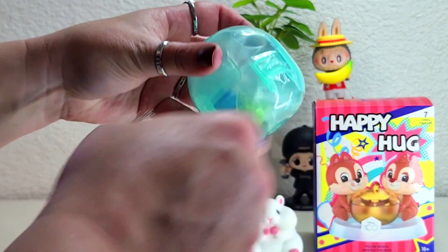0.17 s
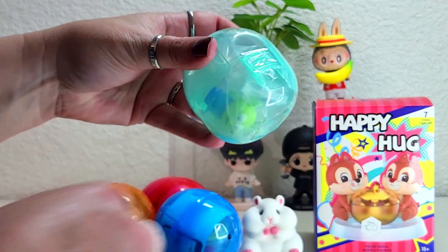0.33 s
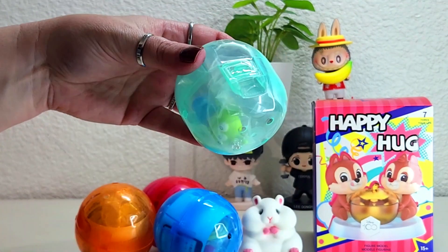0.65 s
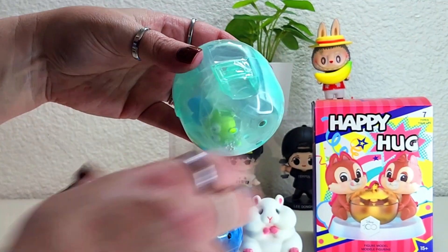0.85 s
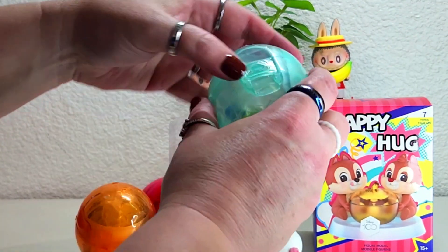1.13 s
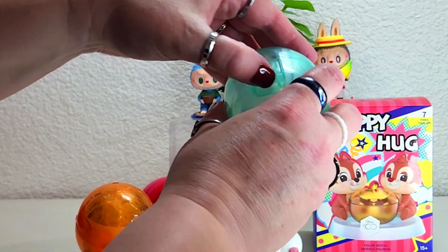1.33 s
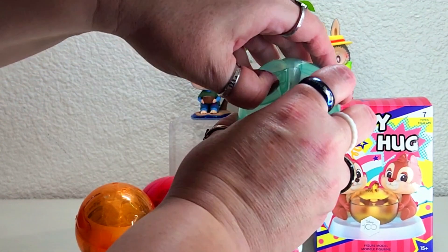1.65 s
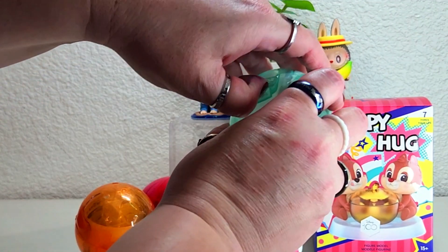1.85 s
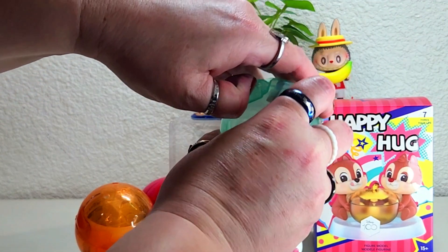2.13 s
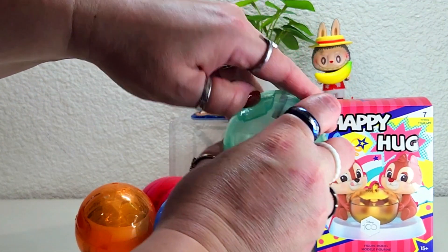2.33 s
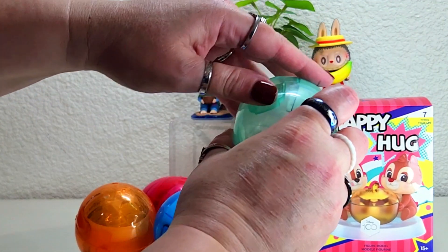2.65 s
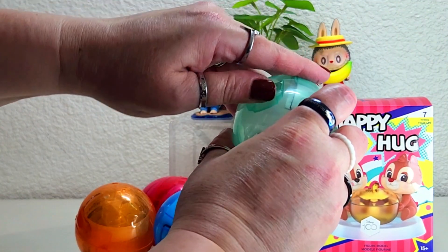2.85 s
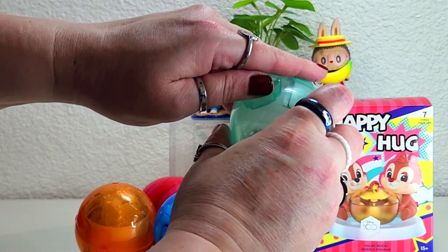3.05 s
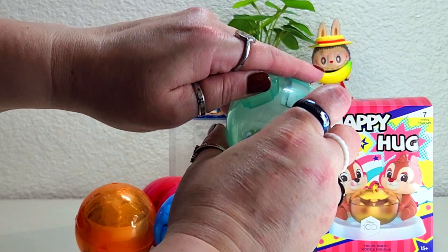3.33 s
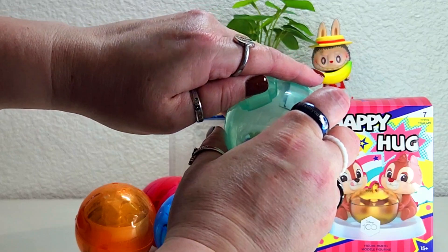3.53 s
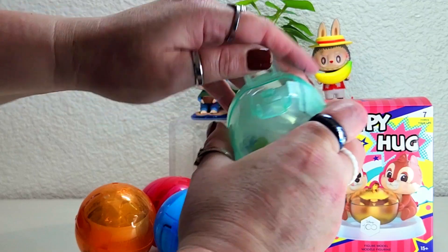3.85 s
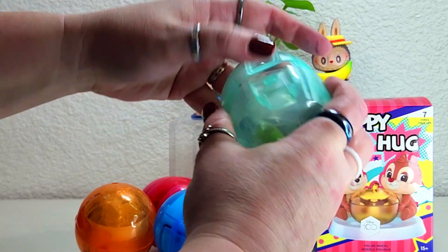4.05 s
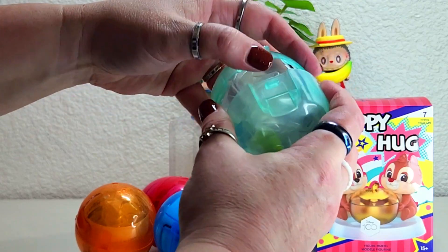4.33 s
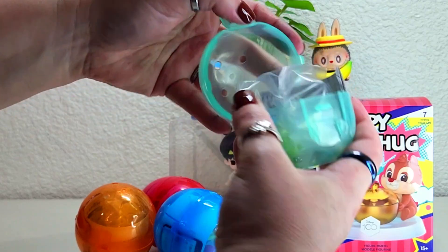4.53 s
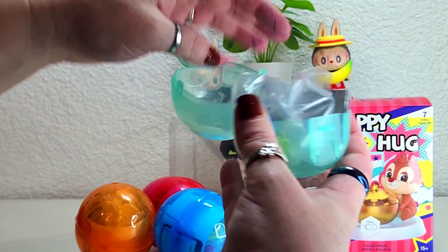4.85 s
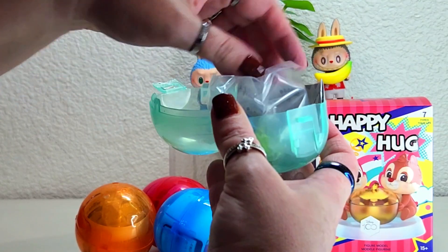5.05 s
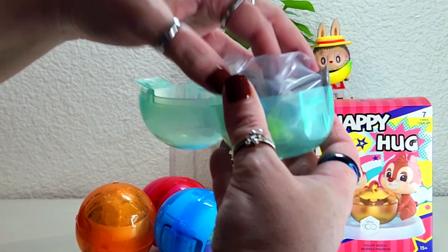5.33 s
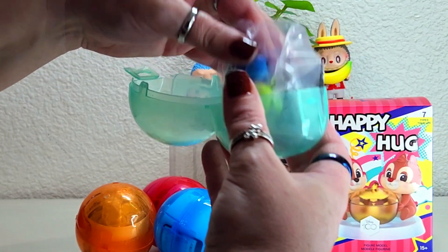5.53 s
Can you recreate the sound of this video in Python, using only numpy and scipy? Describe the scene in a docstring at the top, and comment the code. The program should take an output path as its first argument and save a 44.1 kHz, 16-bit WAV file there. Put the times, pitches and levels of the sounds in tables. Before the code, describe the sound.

Close to the microphone in a small quiet room, a dull tap leads to a quick cluster of hard plastic knocks. Nails tick at a capsule seam, four sharp snaps follow, then a louder hollow pop with a brief chatter. Soft bumps come next, and a thin plastic bag crackles faintly at the end over low hum.

```python
"""A plastic toy capsule is opened by hand, close to the microphone in a small quiet room with a low hum.
A dull tap, then capsules knock; nails pick at the seam, skin rubs the shell and catches snap free one by one,
with soft hollow bumps before and after the halves chatter; last, fingers pinch the crinkly bag inside.
A contact is a noise crack and ring, filtered by the resonances of the body struck; rubbing and creasing
are dense random grains. Echoes with a diffuse tail and filtered-noise room tone lie behind."""
import sys
import numpy as np
from scipy import signal
from scipy.fft import rfft, irfft
from scipy.io import wavfile
from scipy.ndimage import uniform_filter1d

SR = 44100
rng = np.random.default_rng(int(sys.argv[2]) if len(sys.argv) > 2 else 0)


def generate_wav(sig):
    """Save sig (samples, or channels by samples) to the path in sys.argv[1] as 16-bit PCM at SR."""
    pcm = np.round(np.clip(np.atleast_2d(sig).T, -1, 1) * 32767).astype(np.int16)
    wavfile.write(sys.argv[1], SR, pcm)


N = 250488
SIZE = 8192  # samples in one contact or stroke

# Centres of a contact's colour bands: low, hollow, middle, edge, crack [f/Hz]
COLOUR_HZ = [420, 1060, 2530, 6000, 12000]
# Catches letting go [t/s, level/dB, main ring f/Hz, hollow/dB, edge/dB, crack/dB, low/dB,
# left-right/dB, room trim/dB]; colours are densities per Hz re middle band
SNAPS = [(1.8006, -19, 819, 0, 3, 2, -23, 0, -5.5), (2.0764, -19, 2290, -2.5, -4.5, -12, -26, 0.5, -6),
         (2.3692, -23.5, 8100, -1, 14.5, 23, -2, 2.5, -10), (3.0708, -25, 3026, -18.5, 0.5, 2, -29, 4, -13),
         (3.6044, -18, 3460, 8, 0, -18, -20, 3, 0.5)]
# Folds of the bag buckling [t/s, level/dB, main ring f/Hz]
FOLDS = [(5.2753, -55, 1290), (5.2855, -47, 1360), (5.3121, -45, 2030), (5.3223, -44, 1900),
         (5.3604, -46, 1380), (5.38, -44, 2110), (5.397, -43.5, 2070), (5.4128, -35, 2000),
         (5.4347, -55, 5250), (5.4928, -52.5, 2160), (5.5148, -38.5, 1870)]
# Resonances of the held shell [f/Hz, width/Hz, level over the broad response/dB]
SHELL_MODES = [(850, 200, 7.7), (1040, 47, 7), (1240, 75, 13), (1390, 70, 11), (1620, 30, 6), (2240, 50, 5),
               (2980, 130, 3.6), (3350, 160, 5), (4160, 60, 3.7), (4790, 120, 2.1), (5400, 90, 2.7),
               (6170, 50, 1.7), (7620, 140, 13), (8100, 320, 10)]
# Resonances of the bag [f/Hz, width/Hz, level over the broad response/dB]
BAG_MODES = [(1295, 200, 10.7), (1940, 160, 5.6), (3070, 120, 3.6), (5250, 210, 1.7), (7560, 680, 8.6)]
# Ring of soft shell contacts [crack decay/s, ring decay/s, ring level/dB]
BUMP_RING = (.002, .005, 2)


def catch_snaps():
    """Catches let go: a very short crack excites the held shell."""
    # [crack decay/s, ring decay/s, ring level/dB]
    ring = (.0006, .006, -7)
    return contacts(SNAPS, SHELL_MODES, *ring, main_db=13.0, room_db=-3.0, lag_s=2.7e-5)


def chatter(count, pitch_spread_oct):
    """After the last catch the halves meet in an uneven, fading run of contacts."""
    gap_s, first_db, fall_db_per_s, centre_hz = .0065, -33, 63, 1450
    # Colour re middle band [hollow/dB, edge/dB, crack/dB]
    colour = (0, -1, -20.5)
    late, pitch = rng.uniform(-.5, .5, (count, 2)).T
    after_s = gap_s * (1 + np.arange(count) + late)
    last_snap_s = SNAPS[-1][0]
    rows = []
    for t, p in zip(after_s, pitch):
        level_db = first_db - fall_db_per_s * t
        main_hz = centre_hz * 2 ** (pitch_spread_oct * p)
        rows.append((last_snap_s + t, level_db, main_hz, *colour))
    return contacts(rows, SHELL_MODES, *BUMP_RING, main_db=11.5, room_db=-7, lag_s=3.3e-5)


def capsule_knocks():
    """Closed capsules knock together and ring in their own modes."""
    # [t/s, level/dB, main ring f/Hz, hollow/dB, edge/dB, crack/dB, low/dB, left-right/dB, room trim/dB]
    hits = [(0.5904, -19, 2370, -1, -9.5, -26, -9, 5.5, -11),
            (0.6095, -28.5, 2620, 1.5, -15.5, -39.5, -11, -7.5, 0.5),
            (0.654, -43, 2454, 2.5, -9, -33, -10.5, 0, -7.5),
            (0.6898, -18.5, 2370, 2.5, -3.5, -15.5, -9, 8, -11.5)]
    # Resonances of the closed capsules [f/Hz, width/Hz, level over the broad response/dB]
    modes = [(580, 110, -0.5), (1219, 230, 7.5), (1148, 46, 17.5), (1880, 46, 10.5), (2070, 70, 9.5),
             (2446, 62, 14.5), (2640, 37, 13), (2990, 29, 8), (4030, 30, 8.5), (4840, 70, 11.5),
             (7714, 200, 14.5)]
    # [crack decay/s, ring decay/s, ring level/dB]
    ring = (.0016, .0075, 5)
    return contacts(hits, modes, *ring, main_db=5, room_db=1.0, lag_s=3.3e-5)


def light_touches(stray_count):
    """Light touches excite the shell; faint stray ticks fall at random while nails hunt for the seam."""
    # Light touches on the shell, from a dull first tap to bright nail ticks; a harder touch tilts the
    # colour up [t/s, level/dB, main ring f/Hz, tilt/(dB/octave)]
    touches = [(0.0795, -53, 1930, -9.5), (0.546, -57.5, 4700, -2), (0.8654, -45, 6670, 6),
               (1.2795, -45.5, 7800, 0), (1.3377, -56, 6080, -7), (1.4972, -42, 5200, 7),
               (1.5663, -45.5, 5200, -1.5), (1.6114, -49, 4450, 4), (1.732, -48.5, 6270, 6),
               (1.7393, -35, 6500, 9), (1.7877, -40.5, 7800, -2.5), (2.0538, -46, 8100, -2),
               (2.3087, -54.5, 8040, -2.5), (2.5989, -46.5, 3075, -6.5), (3.0393, -52.5, 5220, 2.5),
               (3.1585, -49, 7600, 8), (3.9736, -57, 3010, -5.5), (4.3263, -54.5, 7000, -5.5),
               (5.6234, -49.5, 3300, -7.5)]
    # Colour at zero tilt, re middle band [hollow/dB, edge/dB, crack/dB]
    colour = (-17, 3.5, 0.99)
    # [crack decay/s, ring decay/s, ring level/dB]
    ring = (.0008, .003, -4)
    from_s, to_s = 1.1, 3.4
    stray_db, stray_hz, stray_tilt_db_per_oct = -64.5, 7600, 4
    stray_times_s = rng.uniform(from_s, to_s, stray_count)
    strays = [(s, stray_db, stray_hz, stray_tilt_db_per_oct) for s in stray_times_s]
    rows = [(s, db, hz, *tilted(colour, tilt)) for s, db, hz, tilt in list(touches) + strays]
    return contacts(rows, SHELL_MODES, *ring, main_db=14, room_db=-9.5, lag_s=2.7e-5)


def hollow_bumps():
    """The shell and its contents bump softly, before and after it opens, mostly with a hollow sound."""
    # [t/s, level/dB, main ring f/Hz]
    hits = [(2.2717, -57, 800), (2.3745, -46.5, 863), (4.1261, -47.5, 990), (4.2166, -54, 1285),
            (4.2275, -49.5, 1310), (4.2359, -39.5, 1310), (4.3654, -61.5, 1250), (4.407, -62, 1260),
            (4.445, -62, 1270), (5.1044, -58.5, 1302)]
    # Colour re middle band [hollow/dB, edge/dB, crack/dB]
    colour = (15.2, -4, -21.5)
    rows = [(s, db, hz, *colour) for s, db, hz in hits]
    return contacts(rows, SHELL_MODES, *BUMP_RING, main_db=18, room_db=-9.5, lag_s=3.3e-5)


def bag_folds():
    """Folds of the bag buckle; the harder one gives way, the brighter it is."""
    # Colour of a fold of mean level, re middle band [hollow/dB, edge/dB, crack/dB]
    colour = (2.9, -10, -25)
    # [crack decay/s, ring decay/s, ring level/dB]
    ring = (.0011, .0035, -1.5)
    tilt_per_db = .5  # dB/octave for each dB of level
    mean_db = np.mean([db for _, db, _ in FOLDS])
    rows = [(s, db, hz, *tilted(colour, tilt_per_db * (db - mean_db))) for s, db, hz in FOLDS]
    return contacts(rows, BAG_MODES, *ring, main_db=18, room_db=-8.0, lag_s=3.5e-5)


def bag_creases(pan_db):
    """Small creases of the bag give way around the big folds, as the strain allows."""
    film = [(200, -25.0), (650, -17.5), (1200, -6.0), (2200, 2.5),
            (7500, -15.5), (9500, -27), (15000, -24)]  # [f/Hz, level/dB]
    crease = irfft(causal(at_hz(film, bins(SIZE)) + resonances(BAG_MODES, spread_db=2.5)))
    slips = grains(per_s=700, spread_db=3.5)
    crackle = rms_one(signal.fftconvolve(slips, crease[None])[:, :N])
    return crackle * film_strain() * sides(pan_db)


def film_strain():
    """Strain in the film swells before each fold and relaxes after it; as a gain."""
    crease_db, lead_s, trail_s = -11.5, .01, 0.0083  # level re fold; rise and decay constants
    t = np.arange(N) / SR
    swells = []
    for s, db, _ in FOLDS:
        distance = np.maximum((s - t) / lead_s, (t - s) / trail_s).clip(max=20)
        swells.append(from_db(db + crease_db) * np.exp(-distance))
    return np.max(swells, axis=0)


def rubbing(trim_db, main_db, pan_db):
    """Skin, nails and catches drag over the shell in short strokes of dense small slips."""
    # Strokes [middle t/s, half length/s, level before trim/dB, main resonance f/Hz]
    strokes = [(0.075, 0.012, -54.5, 910), (0.325, 0.035, -65.5, 5100), (0.445, 0.012, -63.5, 4700),
               (1.13, 0.063, -67, 7200), (1.24, 0.03, -64.5, 1390), (1.54, 0.089, -72, 5200),
               (2.285, 0.03, -63.5, 1350), (2.61, 0.013, -52, 3400), (3.6, 0.011, -34.5, 3394),
               (4.41, 0.024, -58, 1260), (4.655, 0.021, -65, 1910)]
    # Broad colour of sliding [f/Hz, density per Hz/dB]
    colour = [(300, -27.5), (750, 0), (1500, -5.5), (2800, 0), (5000, -1), (7800, 2.5), (9500, -15),
              (15000, -6)]
    # Resonances excited by sliding [f/Hz, width/Hz, level/dB]
    shell_modes = [(2670, 410, 6.5), (4700, 370, 4), (5200, 180, 6.5), (7800, 660, 7.5)]
    out = np.zeros((2, N))
    t = (np.arange(SIZE) - SIZE // 2) / SR
    slips = grains(per_s=3600, spread_db=2.5)
    for k, (s, half_s, db, main_hz) in enumerate(strokes):
        modes = shell_modes + [(main_hz, main_hz / 4, main_db)]
        shell_db = at_hz(colour, bins(SIZE)) + resonances(modes, spread_db=1.5)
        source = slips[:, k * SIZE:(k + 1) * SIZE]
        stroke = rms_one(irfft(rfft(source) * from_db(shell_db)))
        stroke *= from_db(db + trim_db) * np.exp(-(t / half_s) ** 2)
        add(out, stroke[:, s + t >= 0], max(0, s + t[0]))
    return out * sides(pan_db)


def contacts(rows, modes, crack_s, ring_s, ring_db, main_db, room_db, lag_s):
    """Blows coloured by the body that they strike; returns the direct sound and the room feed."""
    # Microphone response to near sounds [f/Hz, level/dB]
    microphone = [(100, 0.5), (6500, 5), (8100, 0), (9500, -6), (11500, 6), (14300, 3.5), (15700, 5.5)]
    # Port balance, left weak in the bass [f/Hz, left-right/dB]
    port_balance = [(125, -15.5), (280, -8.5), (550, -7), (1100, -3.5), (2200, 1), (4500, 0.5), (9000, 1.5)]
    direct, feed = np.zeros((2, N)), np.zeros((2, N))
    f = bins(SIZE)
    attack = SR // 92  # samples over which the level is set
    fade = np.minimum(1, np.linspace(4, 0, SIZE)) ** 2
    bass_db = -10 * np.log10(1 + (110 / (f + 10)) ** 4)  # a small shell radiates little bass
    lags_s = np.array([[0], [lag_s]])  # the right port hears later
    ports = sides(at_hz(port_balance, f)) * np.exp(-2j * np.pi * f * lags_s)
    for s, level_db, main_hz, hollow, edge, crack, *place in rows:
        low, pan_db, wet_db = place or (-16, 4.5, 0)  # light touches: in the hand, a little to the left
        # grip and touch point single out one broad resonance
        body_db = resonances(modes + [(main_hz, main_hz / 6.5, main_db)], spread_db=2)
        # discount the body's own band levels, so the colour sets the result
        body_power = from_db(body_db) ** 2
        band_power = [np.mean(body_power[(f > hz / 1.5) & (f < hz * 1.5)]) for hz in COLOUR_HZ]
        band_db = np.array([low, hollow, 0, edge, crack]) - 10 * np.log10(band_power)
        colour_db = at_hz(list(zip(COLOUR_HZ, band_db)), f)
        response = causal(body_db + colour_db + bass_db + at_hz(microphone, f))
        sound = irfft(blow(crack_s, ring_s, ring_db) * response * ports) * fade
        sound *= from_db(level_db) / np.sqrt(np.mean(sound[:, :attack] ** 2))
        add(direct, sound * rms_one(sides(pan_db)), s)
        add(feed, sound * from_db(room_db + wet_db), s)
    return np.array([direct, feed])


def blow(crack_s, ring_s, ring_db):
    """Spectrum of one contact: a rough crack, then the dense ring of thin plastic."""
    t = np.arange(SIZE) / SR
    noise = rng.standard_normal((4, SIZE))
    impulse = rms_one(1. * (t == 0))
    crack = rms_one(impulse / 2 + rms_one(noise[0] * np.exp(-t / crack_s)))
    # the dense modes radiate differently towards the two microphones
    modes = noise[1] + 0.87 * noise[2:]
    ring = rms_one(modes * np.exp(-t / ring_s) * (1 - np.exp(-t / crack_s)))
    spectrum = rfft(crack + from_db(ring_db) * ring)
    broad_power = uniform_filter1d(np.mean(abs(spectrum) ** 2, axis=0), size=91)
    return spectrum * causal(-10 * np.log10(broad_power))  # flat overall, random in fine detail


def tilted(colour, db_per_octave):
    """A contact's hollow, edge and crack levels, tipped about the middle band."""
    _, hollow_hz, middle_hz, edge_hz, crack_hz = COLOUR_HZ
    octaves = np.log2(np.array([hollow_hz, edge_hz, crack_hz]) / middle_hz)
    return np.array(colour) + db_per_octave * octaves


def resonances(modes, spread_db):
    """Response in dB of a body; each touch point favours its modes differently."""
    f, power = bins(SIZE), 1
    for hz, width_hz, db in modes:
        peak = from_db(db + spread_db * rng.standard_normal()) ** 2
        power = power + peak / (1 + (2 * (f - hz) / width_hz) ** 2)
    return 10 * np.log10(power)


def grains(per_s, spread_db):
    """Random tiny slips of uneven size, nearly alike left and right; rms 1."""
    sizes = from_db(spread_db * np.minimum(rng.exponential(1, N), 4))
    happens = rng.random(N) < per_s / SR
    heights = rng.standard_normal(N) + 0.24 * rng.standard_normal((2, N))
    return rms_one(happens * sizes * heights)


def room(feed, build_s, echo_db):
    """Separate echoes off table and wall thicken into a diffuse tail that dies fastest in the top treble."""
    # Tail colour [f/Hz, level/dB]
    colour = [(200, 3.5), (600, -2), (1100, -4), (2300, -5.5), (4500, 0), (8000, 1), (14000, 1)]
    # Decay by 60 dB [f/Hz, t/s]
    t60 = [(200, 0.33), (1000, 0.35), (3000, 0.3), (7000, .31), (14000, 0.19)]
    t = np.arange(SR * 2 // 3) / SR
    edges_hz = [60, 400, 800, 1600, 3200, 6400, 10000, 20000]
    density = np.minimum(1, .01 + (t / .25) ** 2)
    happens = rng.random(len(t)) < density
    arrivals = rng.standard_normal((2, 2, len(t))) * happens / np.sqrt(density)
    tail = 0
    for k, (low, high) in enumerate(zip(edges_hz, edges_hz[1:])):
        hz = np.sqrt(low * high)
        bandpass = signal.butter(2, [low, high], "band", fs=SR, output="sos")
        band = signal.sosfilt(bandpass, arrivals[k % 2])
        tail = tail + band * from_db(at_hz(colour, hz) - 60 * t / at_hz(t60, hz))
    tail *= 1 - np.exp(-(t / build_s) ** 2)
    tail = rms_one(tail) / np.sqrt(len(t))
    for side in tail:
        echo_at = (rng.uniform(.003, .014, 4) * SR).astype(int)
        side[echo_at] += from_db(echo_db) * rng.choice([-1, 1], 4)
    return signal.fftconvolve(feed, tail, axes=1)[:, :N]


def room_tone(air_db, hum_trim_db):
    """Low ventilation rumble and faint hiss from filtered noise; an appliance's hum from sines."""
    # Air spectrum shape [f/Hz, density per Hz/dB]
    air_shape = [(15, -35), (30, -3), (42, 4), (62, 3.5), (100, -5), (123, -2), (190, -26), (293, -9.5),
                 (405, -27.5), (476, -20), (887, -25), (2000, -22.5), (4030, -25.5), (7510, -25),
                 (8360, -28.5), (9070, -58), (11600, -32.5), (16000, -40.5)]
    # Air likeness [f/Hz, left-right correlation/1]
    likeness = [(60, 1), (130, 0.24), (290, 0.69), (640, .55), (1400, 0.1), (7000, .05)]
    # Air balance [f/Hz, left-right/dB]
    balance = [(60, -16.5), (110, -2), (380, -22), (700, -7.5), (1300, -3), (4400, 4), (12000, 12.5)]
    # Mains appliance [f/Hz, amplitude before trim/dB]
    hum_lines = [(119.5, -69), (288, -85)]
    f = bins(N)
    mid, side = rfft(rng.standard_normal((2, N)))
    alike = np.clip(at_hz(likeness, f), 0, 1)
    pair = np.sqrt(1 + alike) * mid + np.sqrt(1 - alike) * side * [[1], [-1]]
    air = rms_one(irfft(pair * from_db(at_hz(air_shape, f)) * sides(at_hz(balance, f)), N))
    t = np.arange(N) / SR
    hum = sum(from_db(db) * np.sin(2 * np.pi * hz * t) for hz, db in hum_lines)
    return from_db(air_db) * air + from_db(hum_trim_db) * hum


def from_db(db):
    """Decibels to gain."""
    return 10 ** (np.asarray(db) / 20)


def rms_one(x):
    """Scale to unit rms."""
    return x / np.sqrt(np.mean(x ** 2) + 1e-20)


def at_hz(points, hz):
    """Read a spectrum on a log-frequency axis."""
    freqs, values = np.transpose(points)
    return np.interp(np.log(np.maximum(hz, 1)), np.log(freqs), values)


def bins(size):
    """Frequencies of a real FFT in Hz."""
    return np.fft.rfftfreq(size, 1 / SR)


def sides(pan_db):
    """Left and right gains for a level difference."""
    return from_db(np.array([[.5], [-.5]]) * pan_db)


def causal(response_db):
    """Minimum-phase response: nothing rings before the blow."""
    cepstrum = irfft(np.log(from_db(response_db)))
    cepstrum[1:SIZE // 2] *= 2
    cepstrum[SIZE // 2 + 1:] = 0
    return np.exp(rfft(cepstrum))


def add(track, sound, s):
    """Mix a sound in at a time in seconds."""
    start = int(s * SR)
    track[:, start:start + sound.shape[1]] += sound[:, :N - start]


def scene():
    """All handling sounds, their reverberation and the room tone."""
    shell = catch_snaps() + chatter(count=9, pitch_spread_oct=.55) + capsule_knocks()
    soft = light_touches(stray_count=6) + hollow_bumps()
    direct, feed = shell + soft + bag_folds()
    friction = rubbing(trim_db=-2.5, main_db=12.5, pan_db=6.5) + bag_creases(pan_db=9.0)
    walls = room(feed + from_db(-9.5) * friction, build_s=0.012, echo_db=-6.5) * sides(pan_db=2.5)
    return direct + friction + walls + room_tone(air_db=-66.5, hum_trim_db=-4.5)


def record(dry):
    """The loudest peaks are rounded and the top is cut steeply."""
    cutoff_hz = 16700
    rounded = np.tanh(dry)
    lowpass = signal.ellip(10, .2, 80, cutoff_hz, fs=SR, output="sos")
    return signal.sosfilt(lowpass, rounded)


dry = scene()
out = record(dry)
generate_wav(out)
```